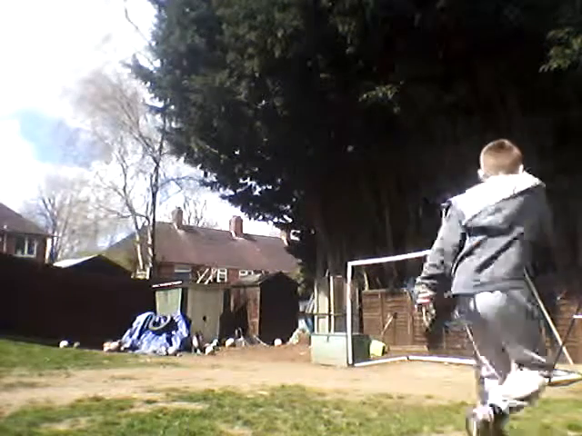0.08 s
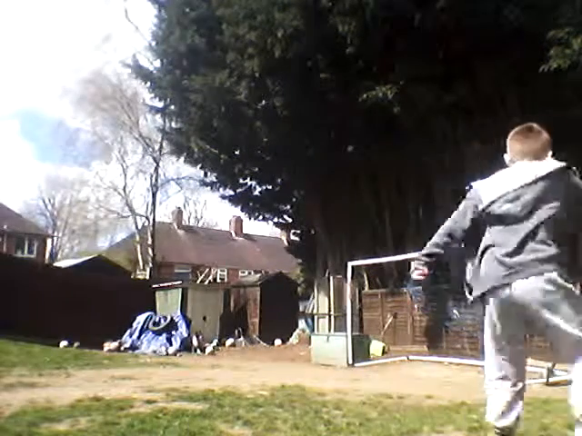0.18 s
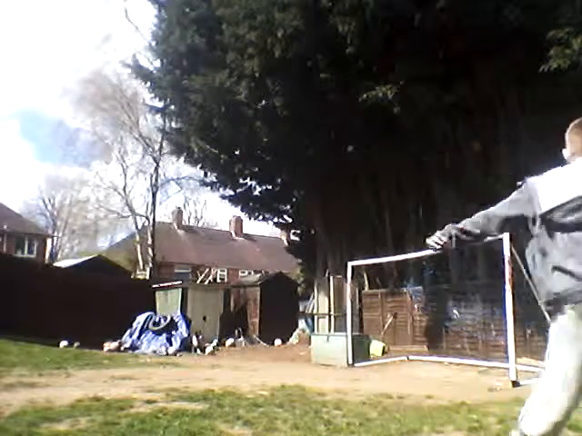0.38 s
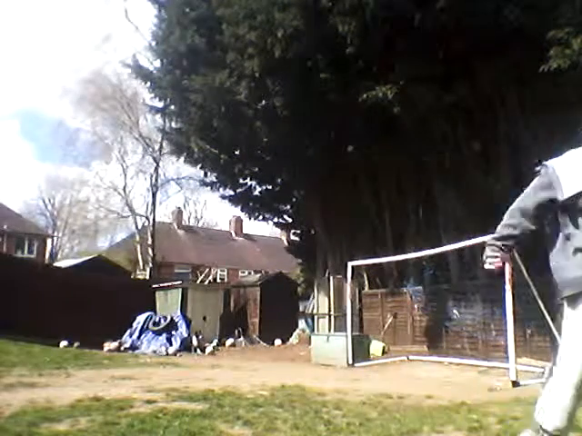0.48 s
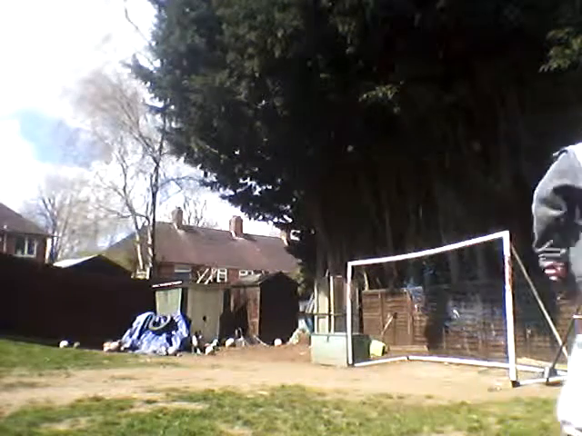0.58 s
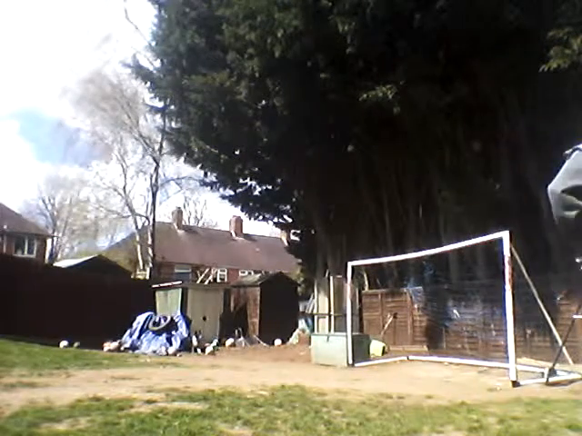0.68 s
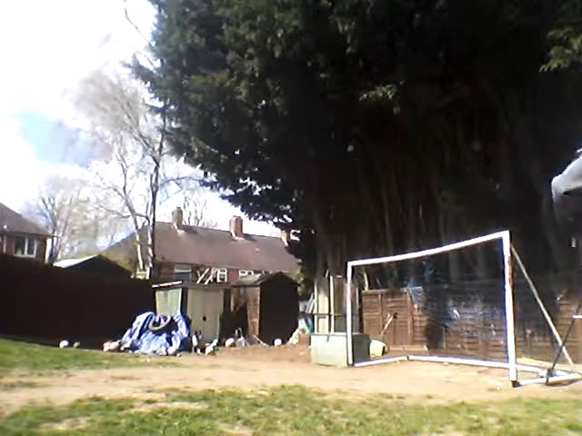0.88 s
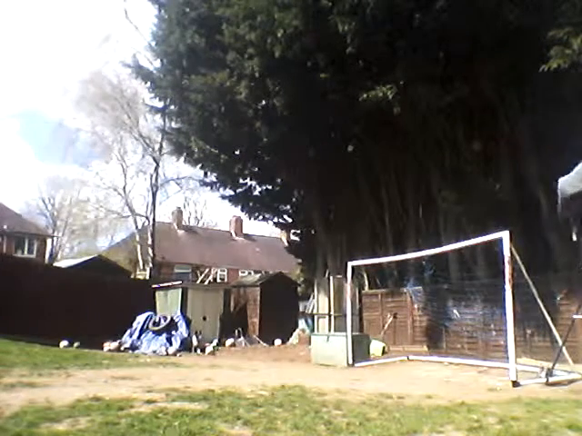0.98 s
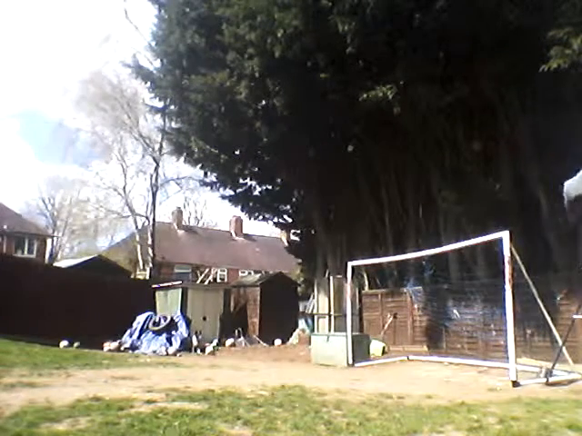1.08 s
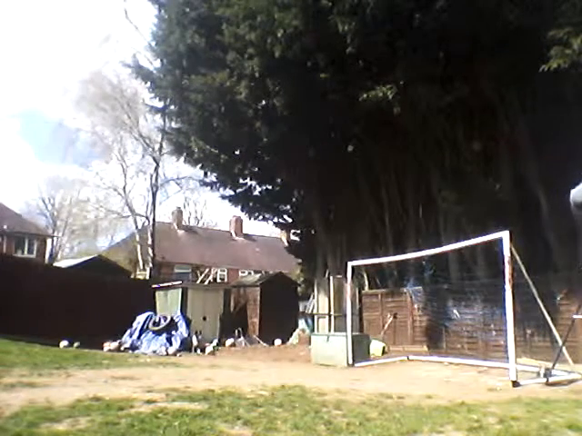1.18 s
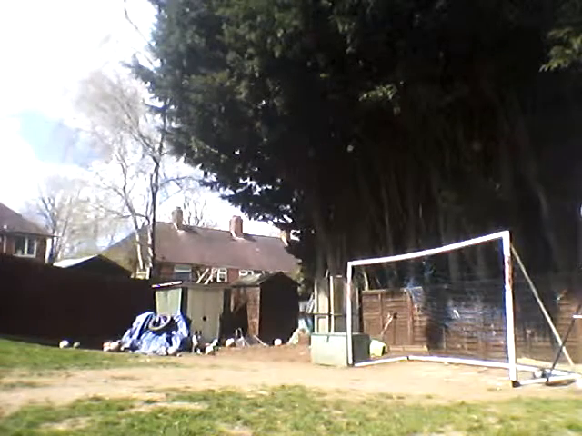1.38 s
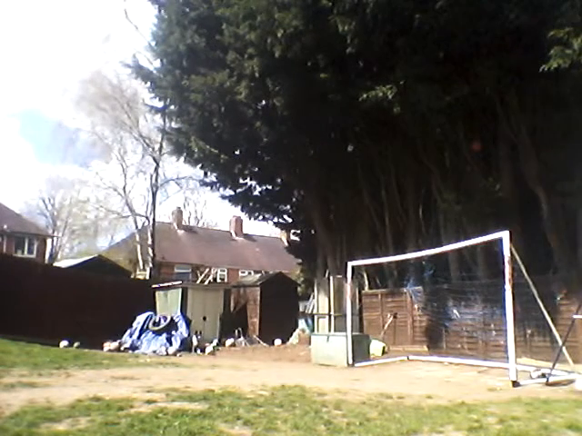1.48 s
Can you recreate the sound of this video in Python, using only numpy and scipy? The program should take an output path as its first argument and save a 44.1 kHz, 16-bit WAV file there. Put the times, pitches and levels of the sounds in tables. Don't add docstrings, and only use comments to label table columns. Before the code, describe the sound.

A football kick dominates: after faint grass scuffs, a toe touch at 0.24 s and a louder, slightly clipped smack at 0.27 s, with a hollow air ring. Echoes return from fence and house walls as a patchy tail fades. Boards knock from 0.3 to 0.75 s, a softer bump lands at 0.6, a faint roll at 1.1 and light tap at 1.4, over quiet town hum and hiss.

```python
import sys
import numpy as np
from scipy import signal
from scipy.fft import rfft, irfft
from scipy.io import wavfile
from scipy.ndimage import uniform_filter1d

SR = 44100
rng = np.random.default_rng(int(sys.argv[2]) if len(sys.argv) > 2 else 0)


def magnitude_from_level(level_db):
    exponent = np.asarray(level_db, float) / 20
    return 10 ** exponent


def generate_wav(signal):
    frames = np.transpose(np.atleast_2d(signal))
    scaled = np.clip(frames, -1, 1) * 32767
    pcm = np.round(scaled).astype(np.int16)
    wavfile.write(sys.argv[1], SR, pcm)


N = 66150

# (frequency [Hz], level [dB], T60 [s])
TOE_MODES = [(441, 0, .12), (614, -2, .12), (290, -12, .1), (800, -16, .1)]
KICK_MODES = [(360, -9, .3), (428, -10, .2), (616, 1, .35), (806, -11, .3), (275, -12, .2), (694, -14, .2),
              (1150, -24, .06), (1840, -6, .04), (2830, -12, .05), (4970, -10, .02)]
BUMP_MODES = [(458, 0, .09), (872, -1, .044), (1227, -3, .04), (600, -3, .06), (985, -10, .08),
              (190, -4, .12)]
ROLL_MODES = [(366, -3, 1.5), (520, 3, .07), (694, -1, .4)]
TAP_MODES = [(608, 0, .4), (818, -4, .25), (370, -2, .25), (455, -5, .2), (1373, -14, .09)]
# (time [s], ring level [dB], ring held [s], slap level [dB], garden tail level [dB])
EARLIER_HIT = (.0005, -41, .012, -52, -47)
TOE_HIT = (.2377, -17, .021, -10.5, -28)
KICK_HIT = (.2652, -9, .019, -9, -20)
BUMP_HIT = (.6125, -25.5, .016, -40, -42)
ROLL_HIT = (1.1155, -41, .036, -65, -56)
TAP_HIT = (1.4245, -35, .016, -48, -52)
# (delay [s], level [dB])
KICK_ECHOES = [
    (.029, -18),
    (.110, -22),
    (.162, -21),
]
# (frequency [Hz], width [Hz], level [dB])
SKIN_BANDS = [(2100, 700, -3), (2850, 1000, -2), (3900, 900, -3), (4600, 900, -2), (6800, 4000, -24),
              (11500, 7000, -30)]
# (frequency [Hz], T60 [s])
GARDEN_T60 = [(200, .7), (500, .6), (1200, .7), (3000, .75), (6000, .62), (11000, .6)]
# (frequency [Hz], density [dB per Hz])
GARDEN_COLOUR = [(120, -26), (250, -8), (366, -5), (810, -4), (1430, -9), (2820, -9), (5100, -14),
                 (6300, -25), (8000, -30), (11000, -52)]
# (time [s], rise [s], fall [s], level [dB], centre [Hz])
SCUFFS = [(.035, .015, .03, -54, 1800), (.088, .02, .015, -55, 4500), (.212, .002, .01, -51, 4800),
          (.228, .001, .008, -42, 4000), (.418, .02, .025, -36, 2800), (.52, .02, .02, -53, 4500),
          (.611, .001, .006, -40, 4800), (.617, .001, .004, -47, 9000), (.65, .03, .04, -53, 5000),
          (.67, .01, .01, -45, 1200), (.72, .03, .02, -49, 600), (.73, .02, .01, -58, 4800),
          (1.12, .002, .02, -46, 560), (1.16, .01, .08, -52, 370), (.325, .01, .02, -31, 1800),
          (.266, .004, .012, -30, 110), (1.24, .05, .06, -54, 800), (1.425, .001, .006, -47, 2800),
          (1.17, .04, .1, -62, 3500), (1.30, .002, .01, -58, 2200), (1.39, .04, .06, -55, 900),
          (1.45, .01, .08, -50, 700), (1.485, .01, .02, -56, 1600)]
# (frequency [Hz], density [dB per Hz])
TOWN_COLOUR = [(30, -24), (60, -18), (140, -6), (300, -5), (750, -8), (1700, -20), (5200, -22), (6200, -29),
               (14500, -25)]
# (time [s], level [dB], frequency [Hz], T60 [s])
THUMPS = [(.290, -21, 650, .12), (.296, -21, 370, .14), (.315, -25, 280, .08), (.382, -28, 400, .08),
          (.324, -22, 830, .05), (.345, -27, 830, .08), (.440, -32, 355, .2), (.499, -34, 640, .03),
          (.518, -33, 600, .02), (.636, -35, 330, .03), (.666, -35, 470, .04), (.668, -35, 1100, .03),
          (.691, -34, 400, .02), (.692, -38, 1100, .02), (.707, -34, 650, .05), (.718, -35, 400, .04),
          (.735, -43, 650, .04), (.761, -41, 770, .06), (1.18, -46, 560, .05), (1.258, -46, 850, .04),
          (1.475, -45, 850, .05)]

SLAP_RISE_S, SLAP_T60_S, SLAP_LOW_HZ = .0007, .042, 1700
SNAP = 1.6
RING_LAG_S, RING_RISE_S, LET_GO_T60_S = .0017, .001, .02
ECHO_DULL_HZ = 2500
GARDEN_FILLS_S, GARDEN_PATCHY_DB = .006, 2.6
GARDEN_EDGE_S, BEYOND_T60_S = .17, 1.0
SCUFF_GRAIN_DB, SCUFF_WIDTH = 2.2, .9
TOWN_DB = -53
MIC_LOW_HZ, TOP_HZ = 230, 14600
STARVE_HZ, STARVE_DB = 10000, -60
LOUD_DB = -32


def band(x, hz, width):
    sharpness = max(hz / width, .3)
    return signal.lfilter(*signal.iirpeak(min(hz, .45 * SR), sharpness, fs=SR), x)


def two_bands(x, hz, width):
    return band(band(x, hz, width), hz, width)


def high_pass(x, order, hz):
    return signal.sosfilt(signal.butter(order, hz, "high", fs=SR, output="sos"), x)


def across(table, hz):
    table_hz, values = np.array(table).T
    return np.interp(np.log(hz), np.log(table_hz), values)


def fade(t, t60):
    return magnitude_from_level(-60 * np.maximum(t, 0) / t60)


def walk(rate):
    k = int(SR / rate)
    steps = np.repeat(rng.standard_normal(N // k + 1), k)
    return 1.3 * uniform_filter1d(uniform_filter1d(steps, k), k)[:N]


def late(x, s):
    return np.pad(x, (int(s * SR), 0))[:N]


def town():
    out, swell = 0, walk(2)
    for hz in 25 * 2 ** np.arange(0, 9.3, 1 / 3):
        wander_db = (.6 * swell + 1.5 * walk(12)) * min(1500 / hz, 1)
        noise = two_bands(rng.standard_normal(N), hz, hz / 3)
        out = out + magnitude_from_level(across(TOWN_COLOUR, hz) + wander_db) * noise
    return out / out.std() * magnitude_from_level(TOWN_DB)


def garden():
    t = np.arange(N) / SR
    out, power = 0, 0
    bursts_db = 1.5 * walk(90)
    for hz in 150 * 2 ** np.arange(0, 6.3, 1 / 3):
        noise = magnitude_from_level(across(GARDEN_COLOUR, hz)) * two_bands(rng.standard_normal(N), hz, hz / 3)
        noise = noise * magnitude_from_level(GARDEN_PATCHY_DB * walk(40) + bursts_db)
        out = out + noise * fade(t, across(GARDEN_T60, hz))
        power = power + noise.var()
    fill = np.minimum(t / GARDEN_FILLS_S, 1)
    return out * fade(t - GARDEN_EDGE_S, BEYOND_T60_S) * fill / np.sqrt(power)


def air_ring(modes, held):
    t = np.maximum(np.arange(N) / SR - RING_LAG_S, 0)
    ring = sum(magnitude_from_level(db) * np.sin(2 * np.pi * hz * t) * fade(t, t60) for hz, db, t60 in modes)
    return ring * np.minimum(t / RING_RISE_S, 1) * fade(t - held, LET_GO_T60_S)


def skin_slap():
    t = np.arange(N) / SR
    burst = rng.standard_normal(N) * np.minimum(t / SLAP_RISE_S, 1) * fade(t, SLAP_T60_S)
    burst = burst * (1 + SNAP * fade(t, .006))
    slap = 3 * sum(magnitude_from_level(db) * two_bands(burst, hz, width) for hz, width, db in SKIN_BANDS)
    return high_pass(slap, 4, SLAP_LOW_HZ)


def ball(hit, modes, echoes=()):
    start, ring_db, held, slap_db, tail_db = hit
    direct = magnitude_from_level(ring_db) * air_ring(modes, held) + magnitude_from_level(slap_db) * skin_slap()
    dull = signal.lfilter(*signal.butter(2, ECHO_DULL_HZ, fs=SR), direct)
    returned = sum(magnitude_from_level(db) * late(dull, s) for s, db in echoes)
    return late(direct + magnitude_from_level(tail_db) * garden() + returned, start)


def feet():
    t, out = np.arange(N) / SR, 0
    for s, rise, fall, db, hz in SCUFFS:
        grains = rng.standard_normal(N) * magnitude_from_level(SCUFF_GRAIN_DB * rng.exponential(size=N))
        grains = two_bands(grains, hz, SCUFF_WIDTH * hz)
        shape = np.exp(-np.where(t < s, ((s - t) / rise) ** 2, (t - s) / fall))
        out = out + magnitude_from_level(db) * shape * grains / grains.std()
    return out


def echo_thumps():
    t, out = np.arange(N) / SR, 0
    for s, db, hz, t60 in THUMPS:
        note = np.sin(2 * np.pi * hz * np.maximum(t - s, 0)) * fade(t - s, t60)
        out = out + magnitude_from_level(db) * note * np.clip((t - s) / .002, 0, 1)
    return out


def scene():
    hits = ball(EARLIER_HIT, TAP_MODES) + feet()
    hits = hits + ball(TOE_HIT, TOE_MODES) + ball(KICK_HIT, KICK_MODES, KICK_ECHOES) + echo_thumps()
    hits = hits + ball(BUMP_HIT, BUMP_MODES) + ball(ROLL_HIT, ROLL_MODES) + ball(TAP_HIT, TAP_MODES)
    return np.tile(high_pass(hits, 3, MIC_LOW_HZ) + town(), (2, 1))


def roll_off(x):
    return signal.sosfilt(signal.butter(12, 15610, fs=SR, output="sos"), x)


def record(dry):
    cut = signal.sosfilt(signal.ellip(8, .2, 70, TOP_HZ, fs=SR, output="sos"), dry)
    kept = cut
    power_before = uniform_filter1d(cut ** 2, size=3072, origin=1200)
    spectrum, hz = rfft(cut), np.arange(N // 2 + 1) * SR / N
    for low_hz in STARVE_HZ + 700 * np.arange(8):
        part = irfft(spectrum * ((hz >= low_hz) & (hz < low_hz + 700)), N)
        weak = uniform_filter1d(part ** 2, size=1024) < magnitude_from_level(2 * STARVE_DB)
        after_loud = power_before > magnitude_from_level(2 * (LOUD_DB + 2.5 * walk(25)))
        kept = kept - part * uniform_filter1d(1. * (weak & after_loud), size=256)
    return roll_off(np.clip(kept, -1, 1))


dry = scene()
out = record(dry)
generate_wav(out)
```